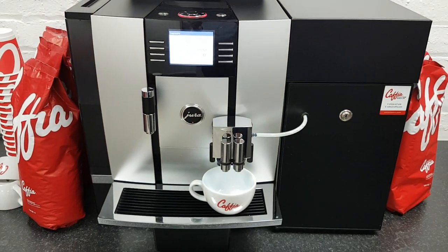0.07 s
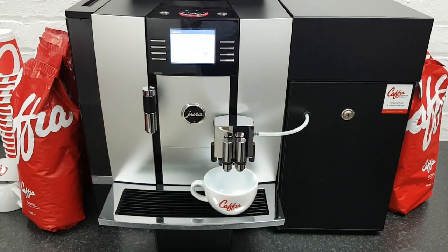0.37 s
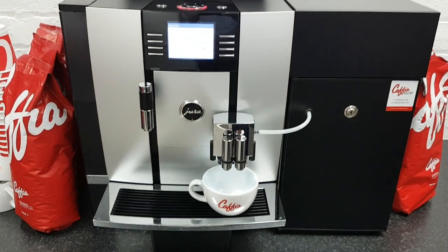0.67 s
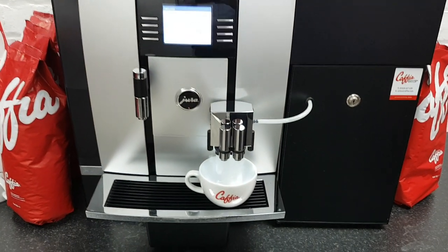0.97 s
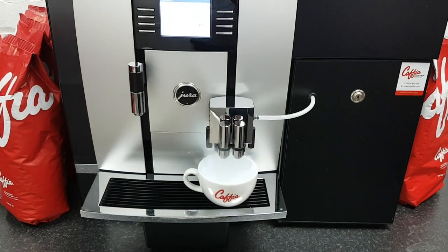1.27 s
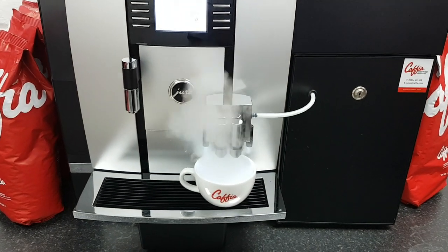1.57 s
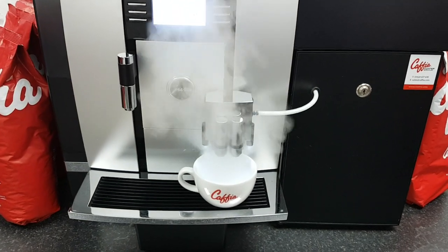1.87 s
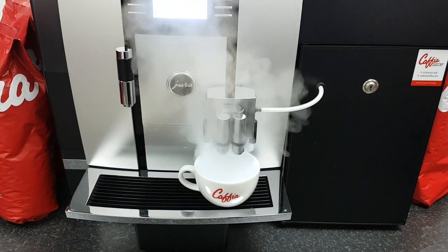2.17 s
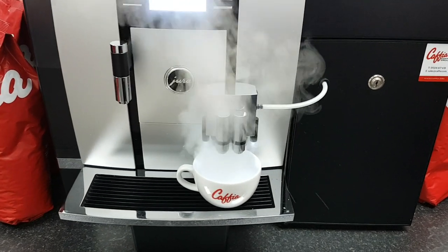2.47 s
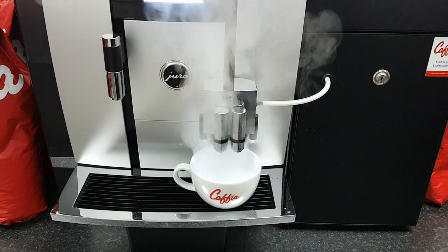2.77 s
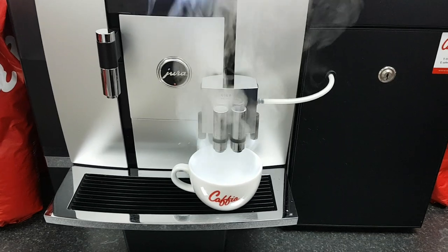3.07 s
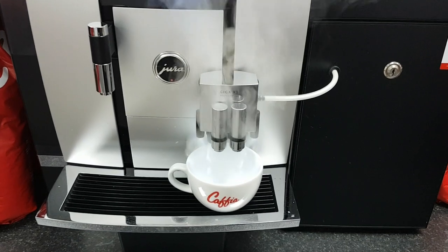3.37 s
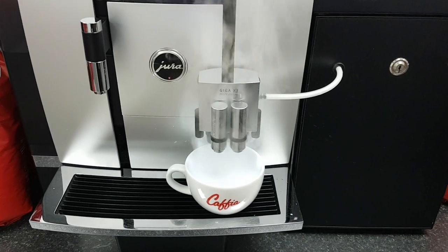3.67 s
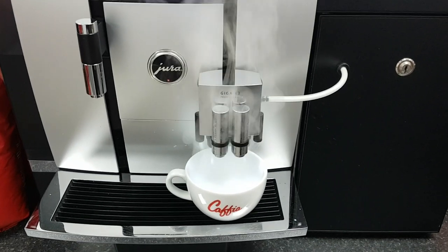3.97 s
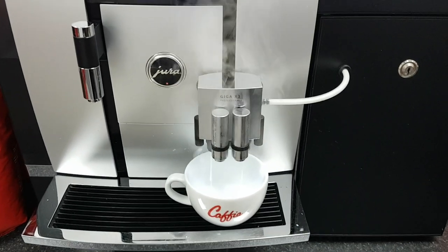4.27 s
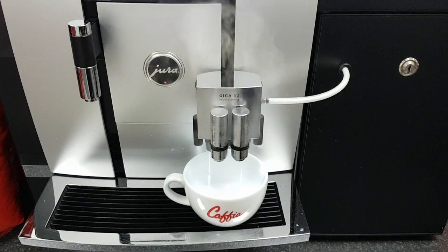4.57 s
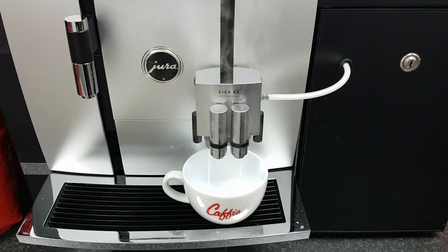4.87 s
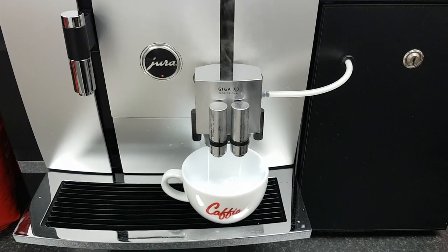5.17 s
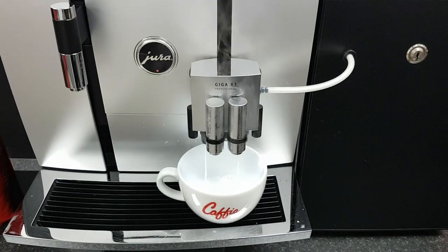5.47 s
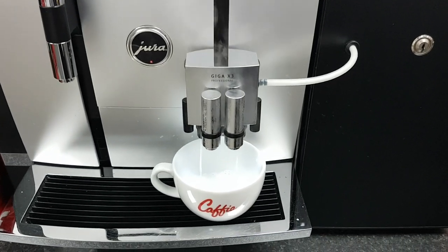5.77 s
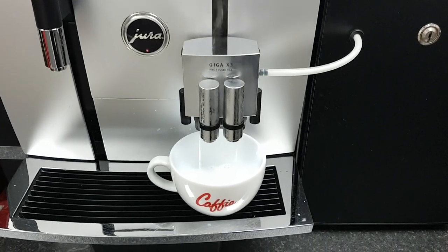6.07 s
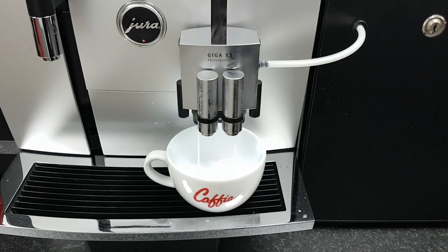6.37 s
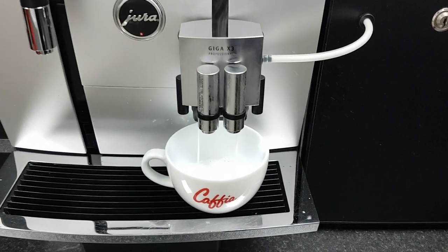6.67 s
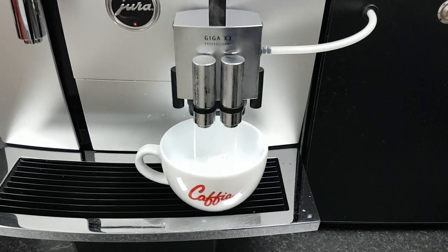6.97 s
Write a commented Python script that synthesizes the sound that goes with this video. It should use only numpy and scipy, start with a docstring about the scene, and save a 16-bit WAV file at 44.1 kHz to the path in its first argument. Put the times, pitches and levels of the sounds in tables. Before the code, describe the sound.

An automatic coffee machine pumps steadily, blasts wet steam that breaks into spurts, then gurgles and hisses as it froths milk.

```python
"""A small room, a stereo microphone close to an automatic coffee machine as it starts its milk frother.
A pump strokes about six times a second and rings the cabinet. A valve opens, the line spits and whistles,
then wet steam blasts from the spout and breaks into spurts. Once milk arrives, the spout gurgles and
sucks air through narrow resonances, a hollow note rises and bubbles snap, while the pump chugs on."""
import sys
import numpy as np
from scipy import signal
from scipy.fft import rfft, irfft, next_fast_len
from scipy.io import wavfile
from scipy.ndimage import uniform_filter1d, map_coordinates

SR = 44100
rng = np.random.default_rng(int(sys.argv[2]) if len(sys.argv) > 2 else 0)


def persist_wave(psi):
    """Save psi, clipped to +-1, as 16-bit WAV."""
    counts = np.round(np.clip(psi, -1, 1) * 32767).astype(np.int16)
    wavfile.write(sys.argv[1], SR, np.atleast_2d(counts).T)


N = 310023
TIME_S = np.arange(N) / SR


# the long blast (dryness is jet hiss relative to flow): time_s, flow_db, dryness_db
STEAM_BLAST = [(.9, -45, -24), (.94, -41, -20), (.98, -32.5, -30), (1.05, -25.5, -26), (1.13, -27, -15.5),
               (1.24, -26.5, -5), (1.7, -25, -2), (1.9, -28, 1.5), (2.07, -26.5, -5), (2.25, -30, -0.5),
               (2.3, -24, -25)]
# spurts of steam and milk: start_s, length_s, roar_db, rasp_db, dryness_db
STEAM_SPURTS = [(0.953, .014, -27.5, -30, -28), (1.092, 0.019, -31.5, -24.5, -19),
                (1.678, 0.033, -27, -22.5, -3.5), (2.187, 0.021, -35, -24, -4.5),
                (2.296, 0.047, -27, -31.5, -10), (2.357, 0.05, -29, -26, -9.5),
                (2.422, 0.058, -28.5, -28, -13.5), (2.524, .1, -29.5, -25.5, -24),
                (2.637, 0.047, -29.5, -24.5, -19), (2.73, 0.053, -30.5, -31.5, -19.5),
                (2.814, 0.044, -28, -29.5, -30), (2.93, 0.024, -32.5, -31.5, -16),
                (2.974, 0.03, -28.5, -33.5, -30), (3.12, 0.036, -30, -38.5, -20.5),
                (3.18, 0.087, -28, -30.5, -22), (3.33, 0.078, -29, -27.5, -27),
                (3.418, 0.043, -26.5, -33.5, -19.5), (3.535, 0.014, -34, -31.5, -19),
                (3.622, 0.02, -51, -43.5, -29)]

def steam_pressure():
    """Roar, rasp and hiss gains: one long blast, and spurts as the steam catches and breaks up."""
    flow_db, dryness_db = curves(STEAM_BLAST)
    low_db = np.minimum(flow_db + 2.5, -29.5)  # the roar follows the flow until the spout is full
    blasting = (TIME_S > STEAM_BLAST[0][0]) & (TIME_S < STEAM_BLAST[-1][0])
    blast = amp([low_db, flow_db, flow_db + dryness_db]) * blasting
    spurts = np.zeros_like(blast)
    for start_s, length_s, roar_db, rasp_db, dry_db in STEAM_SPURTS:
        gains = amp([[roar_db], [rasp_db], [rasp_db + dry_db]])
        add(spurts, start_s, gains * np.ones(int(length_s * SR)))
    drive = np.maximum(blast, spurts)
    bleed_s = 0.024  # pressure builds quickly and bleeds away more slowly
    hold = np.exp(-1 / (bleed_s * SR))
    bleeding = signal.lfilter([1 - hold], [1, -hold], drive)
    return uniform_filter1d(np.maximum(drive, bleeding), size=300)


# low, middle and high resonances of the spout: pitch_hz, width_hz, level_db
ROAR_RESONANCES = [(125.6, 13, -10.5), (175, 25, -5.5), (252.5, 47, -5), (385.3, 11.7, -5.5),
                   (438.6, 7.4, -7.5), (522, 25, -3), (555.7, 14, -3.5), (648, 39, -6.5), (789, 23.6, -3),
                   (852, 53, -0.5), (905, 61, 0.5), (988.5, 53, -1), (1135, 49, -0.5), (1210, 49, -1.5),
                   (1265, 56, -0.5), (1354, 102, -5), (1489, 107, -7.5)]
RASP_RESONANCES = [(2210, 200, -11.5), (2444, 45, -9), (2552, 50, -9), (2678, 38, -10), (2755, 37, -13),
                   (2890, 204, -9), (3173, 252, -6), (3540, 277, -0.5), (3763, 254, 3.5), (3925, 260, 4.5),
                   (4300, 290, 3), (4519, 390, -1), (4820, 210, -5), (5230, 270, -10), (6530, 300, -13),
                   (7600, 650, -14)]
JET_RESONANCES = [(4640, 150, 12.5), (5250, 260, 13.5), (6840, 290, -0.5), (6800, 63, -17),
                  (7360, 300, 1.5), (8280, 230, 10.5), (8620, 260, 8.5), (9240, 76, 6), (9880, 250, 2),
                  (10680, 250, 2.5), (11520, 190, 2.5), (12630, 350, 4), (12800, 260, -4),
                  (13400, 300, 2.5), (14300, 380, 5), (14600, 200, -3), (15100, 260, 6.5), (16000, 120, 7)]
# spectra of the steam that drives them: frequency_hz, level_db
ROAR_SPECTRUM = [(30, -15), (70, 16.5), (130, -1.5), (1480, 1.5), (1700, 1), (3000, 13), (6000, -60)]
RASP_SPECTRUM = [(800, -40), (1600, 17), (2200, 4), (5400, -2.5), (6000, -3), (8000, -8), (9500, -15),
                 (16000, -35)]
JET_SPECTRUM = [(2500, -27), (4500, 0), (5400, -1), (6200, -3), (6600, 2.5), (8600, 1.5), (9400, -0.5),
                (12000, 3), (16000, -2.5)]

def steam():
    """Close up, steam pockets collapse in the wet spout and ring it; the dry jet hisses above."""
    def jet_colour(f):
        return np.sqrt(0.12 + np.abs(ringing(JET_RESONANCES, f)) ** 2) * spectrum(JET_SPECTRUM, f)
    roar_gain, rasp_gain, hiss_gain = steam_pressure()
    spatter = bursts(per_s=260, life_s=0.0041, share=0.45) * amp(0.47 * wobble(35.28))
    roar = turbulence(spatter, lambda f: ringing(ROAR_RESONANCES, f) * spectrum(ROAR_SPECTRUM, f))
    rough = spatter * amp(0.55 * wobble(70))
    rasp = turbulence(rough, lambda f: ringing(RASP_RESONANCES, f) * spectrum(RASP_SPECTRUM, f))
    jet = turbulence(spatter ** .5, jet_colour) * amp(0.93 * wobble(22))
    return roar_gain * roar + rasp_gain * rasp + hiss_gain * jet


# air drawn into the milk, relative to full intake: time_s, level_db
INTAKE = [(3.75, -13.5), (4.3, -5), (4.8, -1.5), (5.1, 0), (5.38, -1.6), (5.6, -.5), (7.03, 0.6)]
# gurgling milk and sucked air, heard beside the spout: frequency_hz, level_db
GURGLE_SPECTRUM = [(60, -42), (120, -11), (170, -8.5), (330, -17), (600, -10.5), (670, -9.5), (730, -0.5),
                   (890, 2), (960, -3.5), (1050, -7), (1170, -12), (1350, -8.5), (1530, -22.5),
                   (2400, -22.5), (4000, -57)]
AIR_SPECTRUM = [(1200, -17), (2600, -6), (2980, 1), (3200, 6.5), (4100, 4), (4750, 4), (5000, -1.5),
                (5750, -8), (6450, 5), (6700, -8.5), (7020, 3.5), (7350, -9.5), (7700, 0), (8800, -25.5),
                (9700, -18), (13000, -17.5), (16000, -24)]
# strength of the nozzle's ring: time_s, level_db
NOZZLE_LEVEL = [(3.7, -56), (4.55, -50), (4.9, -44), (5.1, -37), (5.33, -45), (5.55, -37.5), (6.0, -39.5),
                (6.7, -36.5), (7.03, -39)]
# a hollow ring that grows with the foam: pitch_hz, width_hz, level_db
FOAM_RESONANCE = [(1072, 160, 0)]
THROAT_HZ, THROAT_WIDTH_HZ, NOZZLE_HZ, NOZZLE_WIDTH_HZ = 1854, 88, 3553, 247
MILK_FULL_S, MILK_RISE_DB_PER_S, FOAM_FORMS_S, FOAM_DB_PER_S = 2.56, 150, 5.34, 10.5

def froth():
    """Milk gurgles in the frother and draws in air, which sings in its throat and nozzle."""
    intake_db, = curves(INTAKE)
    def gain(full_db, follows_intake, waver_db):
        return amp(full_db + follows_intake * intake_db + waver_db * wobble(15))
    bubbling = bursts(per_s=220, life_s=0.0053, share=0.38)
    gurgle = gain(full_db=-38.5, follows_intake=0.053, waver_db=1.3)
    gurgle = gurgle * turbulence(bubbling, lambda f: spectrum(GURGLE_SPECTRUM, f))
    air_gain = gain(full_db=-40, follows_intake=0.77, waver_db=0.84)
    sucking = bursts(per_s=450, life_s=0.011, share=0.67)
    air = air_gain * turbulence(sucking, lambda f: spectrum(AIR_SPECTRUM, f))
    throat_gain = gain(full_db=-43, follows_intake=1.34, waver_db=0.86)
    throat = turbulence(bubbling, lambda f: ringing([(THROAT_HZ, THROAT_WIDTH_HZ, 0)], f) ** 0.99)

    nozzle_gain = amp(curves(NOZZLE_LEVEL)[0] + wobble(14))
    sputter = bursts(per_s=130, life_s=0.0054, share=0.46)
    nozzle = turbulence(sputter, lambda f: ringing([(NOZZLE_HZ, NOZZLE_WIDTH_HZ, 0)], f) ** 2)
    foam_age_s = np.maximum(TIME_S - FOAM_FORMS_S, 0)
    pan_db = -1.5 - 2.5 * foam_age_s  # the ring drifts to the right as the foam thickens
    nozzle *= amp(np.outer([.5, -.5], pan_db))
    foam_gain = amp(-59.5 + FOAM_DB_PER_S * foam_age_s)
    foam = foam_gain * turbulence(bubbling, lambda f: ringing(FOAM_RESONANCE, f) ** 2)
    milk_flow = amp(MILK_RISE_DB_PER_S * np.minimum(TIME_S - MILK_FULL_S, 0))
    return milk_flow * (gurgle + air + throat_gain * throat + nozzle_gain * nozzle + foam)


def hollow_note(loudest_s=4.1, pitch_hz=1040, octaves_per_s=0.6):
    """Narrow noise swells and fades around the rising resonance of the frother's shrinking air space."""
    hz = pitch_hz * 2 ** (octaves_per_s * (TIME_S - loudest_s))
    flutter = wobble(130) + 1j * wobble(130)
    note = np.real(flutter * np.exp(2j * np.pi * np.cumsum(hz) / SR))
    return amp(-43) * swell(loudest_s, width_s=0.42) * unit(note)


# one stroke, a squelch and then the valves' thuds: delay_s, length_s, start_hz, end_hz, level_db
PUMP_STROKE = [(0, 0.014, 576, 360, -1.5), (0.009, 0.016, 204, 260, -1.5), (0.0236, .008, 279, 180.6, -0.5),
               (.031, .014, 480, 406, -9), (.038, 0.012, 317, 270, -7.5)]
# strength of the strokes as the line fills: time_s, level_db
PUMP_LEVEL = [(0, -40.5), (.6, -42), (1.2, -32), (3.6, -30), (7, -28)]
# resonances of the cabinet: pitch_hz, width_hz, level_db
CABINET_RESONANCES = [(173.3, 15.7, 6.5), (210, 116, 0), (275.4, 12, 4.5), (340, 35, -7), (409, 18, -19)]
FIRST_STROKE_S, STROKE_PERIOD_S = 0.0872, 0.15975
STROKE_TIMES_S = np.arange(FIRST_STROKE_S, N / SR, STROKE_PERIOD_S)

def pump():
    """Steady strokes open with a hard knock and grow as the line fills; the cabinet rings after each."""
    t = np.arange(SR // 8) / SR
    knock_band = signal.butter(2, [700, 2000], 'band', fs=SR, output='sos')
    knock = signal.sosfilt(knock_band, rng.standard_normal(len(t)))
    stroke = amp(0.5) * knock * amp(-60 * t / 0.1)
    for delay_s, length_s, start_hz, end_hz, level_db in PUMP_STROKE:
        add(stroke, delay_s, amp(level_db) * glide(length_s, start_hz, end_hz))
    strokes = np.zeros(N)
    for start_s in STROKE_TIMES_S:
        add(strokes, start_s, amp(.5 * rng.standard_normal()) * stroke)
    return filtered(strokes * amp(curves(PUMP_LEVEL)[0]), lambda f: 1 + ringing(CABINET_RESONANCES, f))


# water and steam leaving the line: frequency_hz, level_db
PURGE_GURGLE = [(80, -17), (200, 4), (380, -4.5), (560, 3.5), (680, -3), (860, -1.5), (1300, -2.5),
                (1700, -29), (3000, -22), (6000, -50)]
PURGE_HISS = [(700, -18), (1800, 6), (3000, 0), (4900, 2), (6000, -9), (7600, -9.5), (9500, -16.5),
              (16000, -11)]

def line_purge(opens_s=.462, ends_s=.93):
    """The valve opens and the first steam pushes water out of the line, ever harder until the blast."""
    open_for_s = np.clip(TIME_S, opens_s, ends_s) - opens_s
    puff = swell(centre_s=.768, width_s=0.063)  # a first pocket of steam escapes
    gurgle_db = -58 + 34.5 * open_for_s + 6.5 * puff
    hiss_db = -61.5 + 21.5 * open_for_s + 7.5 * puff
    valve = uniform_filter1d(1. * ((TIME_S > opens_s) & (TIME_S < ends_s)), size=200)
    spitting = bursts(per_s=180, life_s=0.0028, share=0.71)
    gurgle = amp(gurgle_db) * turbulence(spitting, lambda f: spectrum(PURGE_GURGLE, f))
    hiss = amp(hiss_db) * turbulence(spitting ** .5, lambda f: spectrum(PURGE_HISS, f))
    return valve * (gurgle + hiss)


# faint steam whistles: start_s, length_s, start_hz, end_hz, level_db
STEAM_WHISTLES = [(.565, .035, 2680, 2620, -54), (.572, .05, 4000, 3600, -47),
                  (.592, .035, 1330, 1210, -53), (.603, .045, 2480, 2180, -52),
                  (.606, .065, 3650, 3250, -54), (.695, .035, 1380, 1200, -48)]

def whistles():
    """Brief falling tones as the steam first finds its way."""
    track = np.zeros(N)
    for start_s, length_s, start_hz, end_hz, level_db in STEAM_WHISTLES:
        add(track, start_s, amp(level_db) * glide(length_s, start_hz, end_hz))
    return track


# bubbles in the nozzle, close to the microphone: start_s, peak_db
BUBBLE_SNAPS = [(5.7474, -25), (5.7583, -25.5), (5.9698, -24), (6.4238, -23.5), (6.5635, -25),
                (6.5854, -20.5), (6.6104, -26), (6.7256, -26), (6.7535, -17.5)]

def bubble_snaps(pitch_hz=3515, length_s=0.004, pitch_spread=0.014):
    """Each bubble snaps in the nozzle with a tiny ping at nearly the same pitch."""
    track = np.zeros(N)
    for start_s, peak_db in BUBBLE_SNAPS:
        hz = pitch_hz * (1 + pitch_spread * rng.standard_normal())
        add(track, start_s, amp(peak_db) * glide(length_s, hz, hz))
    return track


# valve and plumbing clicks: start_s, level_db, t60_s
PLUMBING_CLICKS = [(.357, -48, 0.015), (0.387, -52, 0.018), (.462, -43, 0.056), (.769, -36, 0.039),
                   (.858, -33.5, .025), (1.659, -26, 0.033), (1.69, -30, 0.028), (6.962, -29, 0.028)]
# spectra of those clicks and of the pump's ticks: frequency_hz, level_db
CLICK_SPECTRUM = [(100, -8), (700, 11.5), (2000, 1), (4000, -2), (6000, -10), (15000, -21)]
TICK_SPECTRUM = [(200, -8), (700, 9), (1800, 4), (3300, -2), (5500, -21), (7800, -11), (10000, -24),
                 (15000, -24)]

def valve_clicks(tick_db=-56, tick_t60_s=0.093):
    """The plumbing clicks now and then; the pump's valve ticks with every stroke."""
    ticks = [(start_s, tick_db, tick_t60_s) for start_s in STROKE_TIMES_S]
    return clatter(PLUMBING_CLICKS, CLICK_SPECTRUM) + clatter(ticks, TICK_SPECTRUM)


# reflections from the counter and near walls: delay_s, left_db, right_db
REFLECTIONS = [(.0029, -20, -21), (.0068, -19, -18), (.0117, -20, -20), (.0158, -21, -22)]

def near_echoes(x):
    """Nearby surfaces add weak copies that comb the sound."""
    def comb(f):
        return 1 + sum(amp([[left_db], [right_db]]) * np.exp(-2j * np.pi * f * delay_s)
                       for delay_s, left_db, right_db in REFLECTIONS)
    return filtered(x, comb)


# decay of the small room: frequency_hz, t60_s
ROOM_DECAY = [(150, 0.11), (1000, 0.34), (10000, 0.075)]

def reverb(x):
    """The walls answer differently at each microphone; treble dies first."""
    hz, t, noise = signal.stft(rng.standard_normal((2, SR // 3)), SR, nperseg=256)
    decay = amp(-60 * t / along(ROOM_DECAY, hz)[:, None])
    tail = signal.istft(noise * decay, SR, nperseg=256)[1]
    delayed = np.pad(x, ((0, 0), (260, 0)))
    return signal.fftconvolve(delayed, tail / np.linalg.norm(tail[0]), axes=1)[:, :N]


# the quiet room behind the machine: frequency_hz, level_db
ROOM_SPECTRUM = [(15, -33), (25, -4), (48, -4), (129, 5.5), (281, 0), (567, -3.5), (722, -11), (1170, -20),
                 (1410, -10), (2300, -21), (4870, -30), (6730, -39), (15500, -32)]

def room_tone():
    """A steady low rush that falls away below 30 Hz."""
    return turbulence(1, lambda f: spectrum(ROOM_SPECTRUM, f) * (f / np.hypot(f, 30)) ** 2)


# level between the microphone ports: frequency_hz, left_minus_right_db
MIC_BALANCE = [(60, 1.5), (200, -2), (700, -1.5), (1290, -3), (2380, 0.5), (4400, -4), (8120, -7.5),
               (15000, -1)]
# phase between them: frequency_hz, left_lead_rad
MIC_PHASE = [(1500, 0), (2200, .35), (3200, 0), (4300, .3), (5600, .35), (6600, .9), (8500, 1.9),
             (10000, 1.5), (15800, 1.5)]

def microphone_ports(f):
    """The two ports differ in level and in phase."""
    sides = np.array([[.5], [-.5]])
    return amp(sides * along(MIC_BALANCE, f)) * np.exp(1j * sides * along(MIC_PHASE, f))


# how alike flow noise is at the left and right microphones: frequency_hz, coherence
MIC_COHERENCE = [(40, 0.7), (150, 0.99), (600, 1), (1300, 0.88), (2500, 0.41), (4200, 0.74), (6000, 0.43),
                 (8500, 0.35), (15000, 0.31)]

def turbulence(envelope, response):
    """Stereo flow noise with a mid of rms 1, driven by an envelope and coloured by a response."""
    def colour(f):
        turn = np.arccos(np.clip(along(MIC_COHERENCE, f), -1, 1)) / 2
        return response(f) * np.array([np.cos(turn), np.sin(turn)])
    mid, side = filtered(envelope * rng.standard_normal((2, N)), colour)
    return np.array([mid + side, mid - side]) / np.std(mid)


def bursts(per_s, life_s, share, spread_db=3.3):
    """Envelope of rms 1: a steady flow plus sharp random bursts that carry a share of the power."""
    starts = np.flatnonzero(rng.random(N) < per_s / SR)
    sizes = amp(spread_db * np.minimum(rng.standard_normal(N)[starts], 2))
    hold = np.exp(-2 / (life_s * SR))
    power = signal.lfilter([1], [1, -hold], np.bincount(starts, sizes ** 2, N))
    return np.sqrt(1 - share + share * power / power.mean())


def clatter(hits, colour):
    """Short dying noise bursts of one colour."""
    envelope, t = np.zeros(N), np.arange(SR // 8) / SR
    for start_s, level_db, t60_s in hits:
        add(envelope, start_s, amp(level_db - 60 * t / t60_s))
    return np.sqrt(np.mean(envelope ** 2)) * turbulence(envelope, lambda f: spectrum(colour, f))


def ringing(modes, f):
    """Causal response of resonances, added with alternating signs."""
    return sum((-1) ** k * amp(db) * 1j * f * width / (hz * hz - f * f + 1j * f * width)
               for k, (hz, width, db) in enumerate(modes))


def glide(length_s, start_hz, end_hz):
    """A sliding tone that swells and fades."""
    progress = np.linspace(0, 1, int(length_s * SR))
    hz = start_hz + (end_hz - start_hz) * progress
    return np.sin(np.pi * progress) * np.sin(2 * np.pi * np.cumsum(hz) / SR)


def swell(centre_s, width_s):
    """A bell curve in time, 1 at its centre."""
    return np.exp(-((TIME_S - centre_s) / width_s) ** 2)


def wobble(knots_per_s):
    """A smooth random curve."""
    knots = rng.standard_normal(int(N * knots_per_s / SR) + 4)
    return map_coordinates(knots, [TIME_S * knots_per_s], order=2)


def curves(rows):
    """One value per sample for each column after the time."""
    times_s, *columns = np.transpose(rows)
    return [np.interp(TIME_S, times_s, column) for column in columns]


def along(points, f):
    """Interpolate (frequency_hz, value) points on a log axis."""
    hz, values = np.transpose(points)
    return np.interp(np.log(f + 1), np.log(hz + 1), values)


def spectrum(points, f):
    return amp(along(points, f))


def filtered(x, response):
    """Pass x through a complex response of frequency."""
    size = next_fast_len(N + SR // 2)
    return irfft(rfft(x, size) * response(np.fft.rfftfreq(size, 1 / SR)), size)[..., :N]


def add(track, start_s, sound):
    """Mix a short sound into a track."""
    part = track[..., max(round(start_s * SR), 0):][..., :sound.shape[-1]]
    part += sound[..., :part.shape[-1]]


def amp(db):
    return 10 ** (np.asarray(db) / 20)


def unit(x):
    return x / np.sqrt(np.mean(x ** 2) + 1e-20)


def scene():
    """The machine stands close by and a little to the right, over a quiet room tone."""
    frother = line_purge() + steam() + froth() + hollow_note()
    details = whistles() + bubble_snaps() + valve_clicks()
    machine = amp(-1.23) * near_echoes(frother + details) + pump()
    background = amp(-56.5) * room_tone()
    return filtered(machine + amp(-13.5) * reverb(machine) + background, microphone_ports)


def record(dry, top_hz=15800):
    """The recorder keeps nothing above its band limit."""
    return filtered(dry, lambda f: f < top_hz)


dry = scene()
out = record(dry)
persist_wave(out)
```